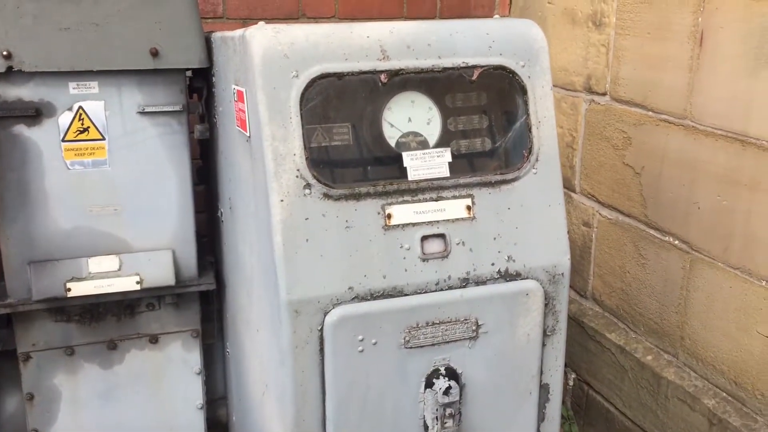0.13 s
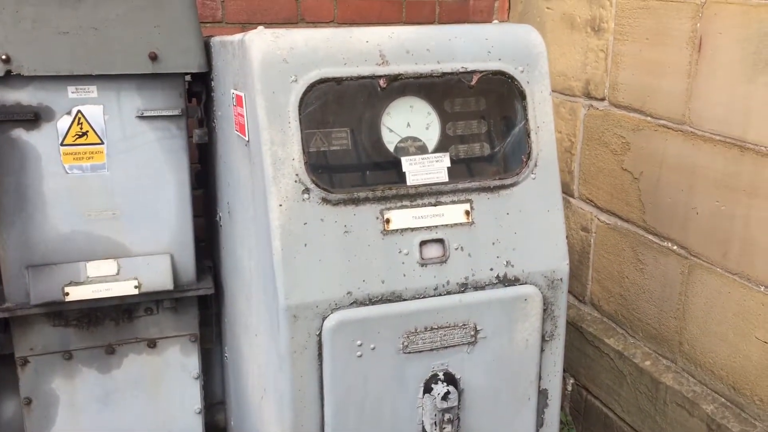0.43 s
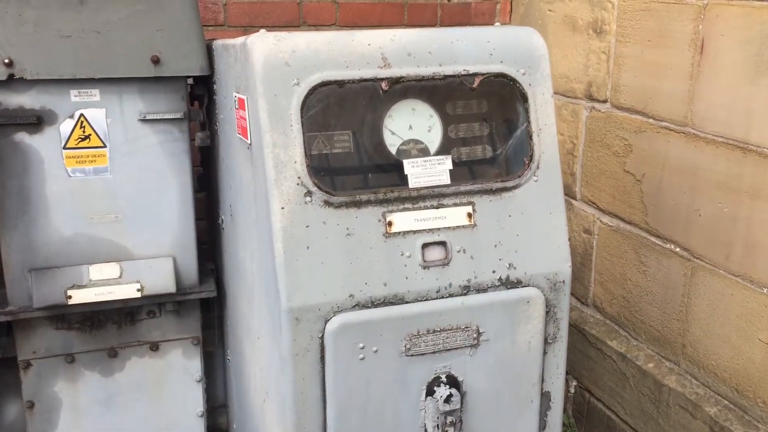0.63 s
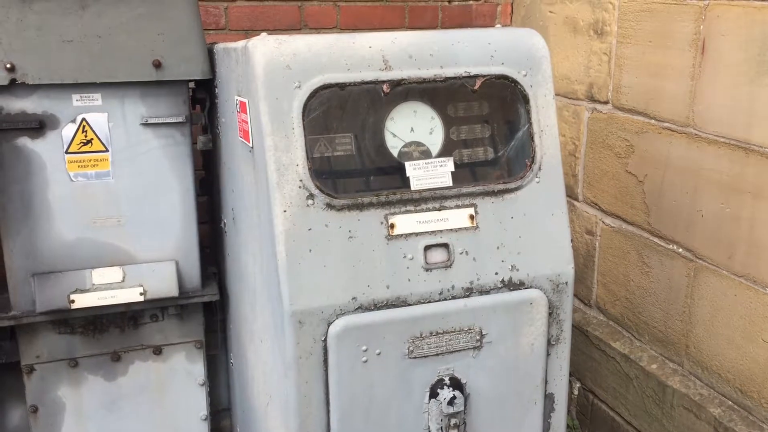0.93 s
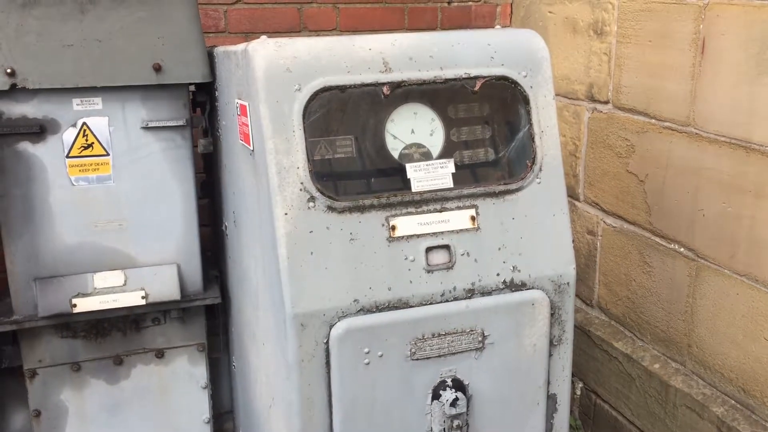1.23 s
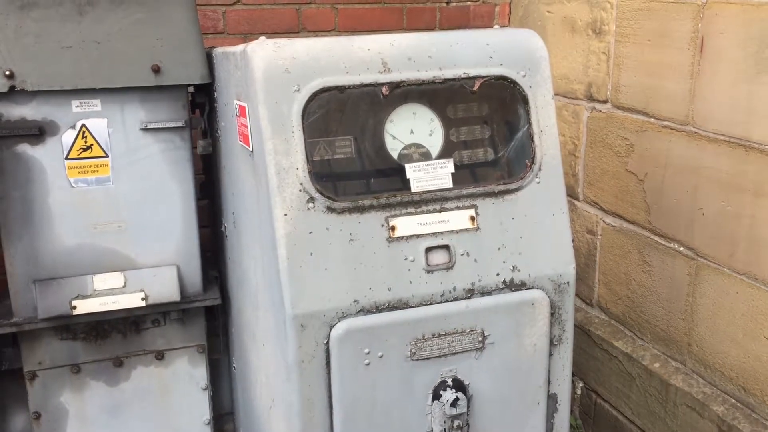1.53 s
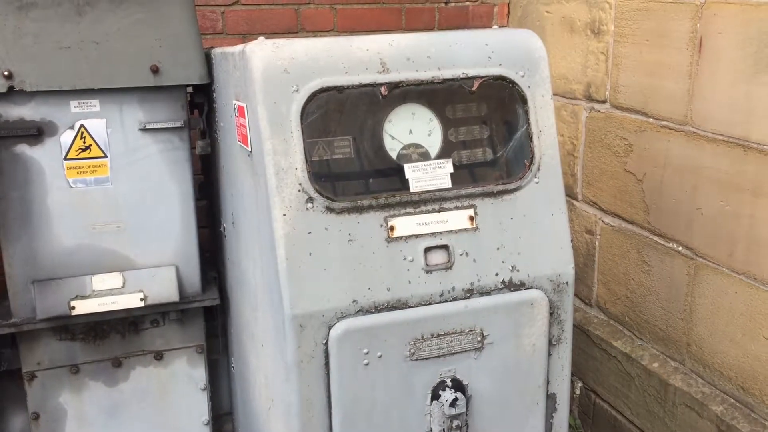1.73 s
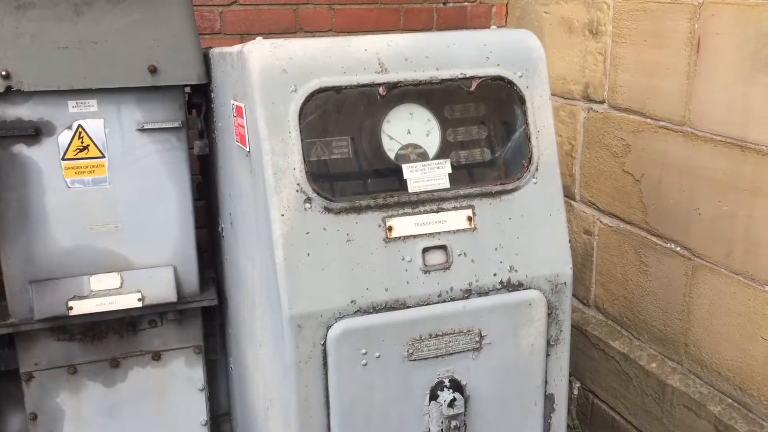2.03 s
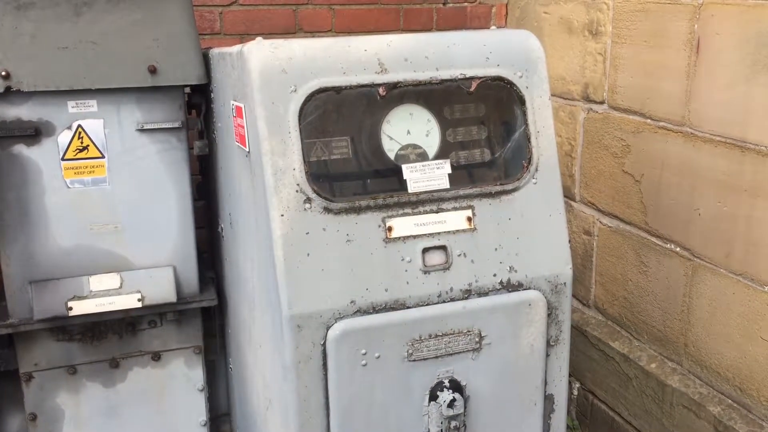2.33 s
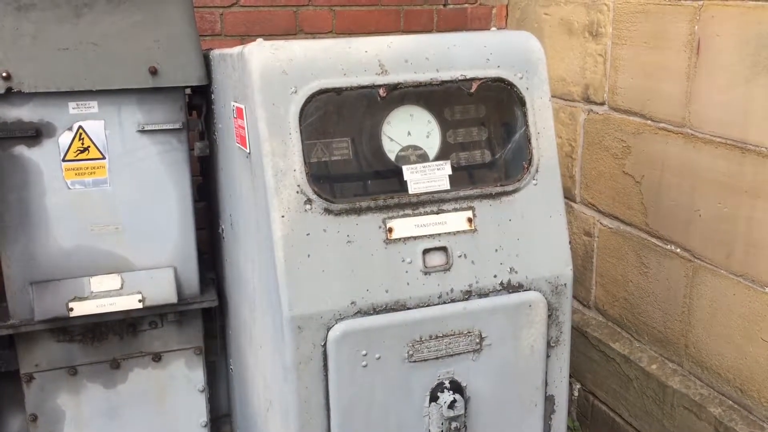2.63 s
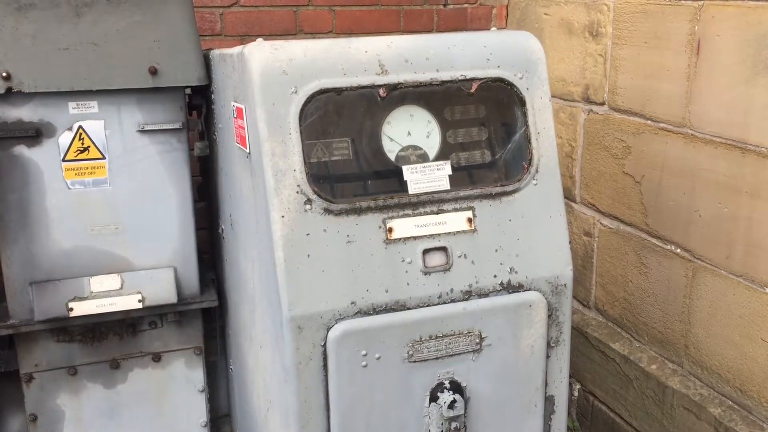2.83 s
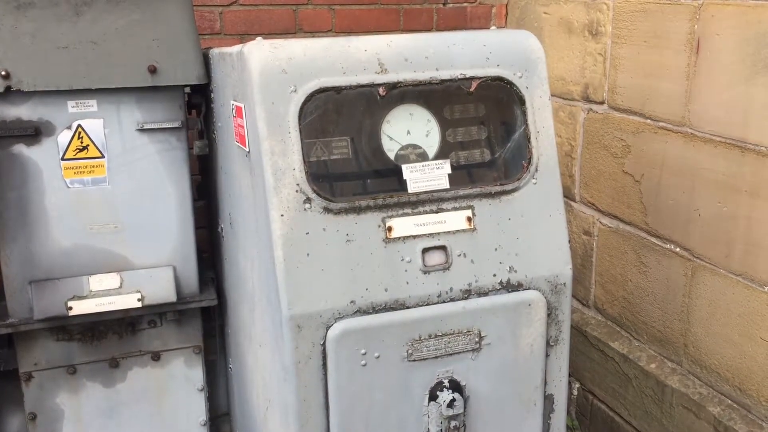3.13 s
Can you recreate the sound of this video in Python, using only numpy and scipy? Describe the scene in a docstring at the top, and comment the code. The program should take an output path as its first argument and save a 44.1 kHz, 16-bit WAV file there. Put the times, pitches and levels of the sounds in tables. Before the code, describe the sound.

Old electrical cabinets buzz steadily in a yard, with far traffic and light wind rumble.

```python
"""A steady buzz from old electrical cabinets in a walled yard, over the wash of distant traffic.
The iron core vibrates on multiples of twice the mains frequency. Light air rumbles on the
hand-held microphone and now and then buffets it; a tiny tick, a rustle and far chirps barely show."""
import sys
import numpy as np
from scipy import signal
from scipy.io import wavfile
from scipy.ndimage import uniform_filter1d

SR = 44100
rng = np.random.default_rng(int(sys.argv[2]) if len(sys.argv) > 2 else 0)


def to_wav(s):
    """Save 16-bit WAV."""
    ch = np.atleast_2d(s).T  # columns
    pcm = np.round(np.clip(ch, -1, 1) * 32767)  # PCM
    wavfile.write(sys.argv[1], SR, pcm.astype(np.int16))


N = 144648
T = np.arange(N) / SR


def amp(db):
    """Decibels to gain."""
    return 10 ** (np.asarray(db) / 20)


def unit(x):
    """Scales to rms 1."""
    return x / np.sqrt(np.mean(x ** 2) + 1e-20)


def curve(points):
    """Joins (time_s, value) points by straight lines."""
    return np.interp(T, *np.transpose(points))


def zero_phase(x, edges_hz, kind):
    """Butterworth filter run both ways, so the band stays in phase with its source."""
    return signal.sosfiltfilt(signal.butter(2, edges_hz, kind, fs=SR, output="sos"), x)


def wander(top_hz):
    """Slow random motion of rms 1, up to the given rate."""
    knots = np.linspace(0, T[-1], num=N // 256)
    rates = np.geomspace(top_hz / 10, top_hz, num=20)
    motion = sum(np.sin(2 * np.pi * (hz * knots + rng.random())) / np.sqrt(hz) for hz in rates)
    return unit(np.interp(T, knots, motion))


def flutter(top_hz):
    """Quick random change of strength and phase, as a complex gain of rms 1."""
    smooth = signal.butter(2, top_hz, fs=SR, output="sos")
    real, imag = unit(signal.sosfilt(smooth, rng.standard_normal((2, N))))
    return (real + 1j * imag) / np.sqrt(2)


def noise(spectrum, patchy_db):
    """Noise of rms 1 shaped by (freq_hz, density_db) points, mottled by drifting patches."""
    bin_hz, _, frames = signal.stft(rng.standard_normal(N), SR, nperseg=2048, noverlap=1536)
    freq_hz, density_db = np.transpose(spectrum)
    colour_db = np.interp(np.log(bin_hz + 1), np.log(freq_hz), density_db)
    patches = uniform_filter1d(rng.standard_normal(frames.shape), size=14, axis=0)
    patches = unit(uniform_filter1d(patches, size=10, axis=1))
    frames = frames * amp(colour_db[:, None] + patchy_db * patches)
    return unit(signal.istft(frames, SR, nperseg=2048, noverlap=1536)[1][:N])


def bump(centre_s, peak_db, half_width_s):
    """A bell-shaped envelope."""
    return amp(peak_db) * np.exp(-((T - centre_s) / half_width_s) ** 2)


def blip(centre_s, peak_db, pitch_hz, half_width_s):
    """A short tone that swells and dies away."""
    return bump(centre_s, peak_db, half_width_s) * np.sin(2 * np.pi * pitch_hz * (T - centre_s))


def cabinet_hum():
    """The core's mains-locked partials, each wavering as the microphone moves among the reflections."""
    # Partials of the iron core: multiple, level_db
    partials = [(1, -58), (2, -53.5), (3, -57.5), (5, -61.5), (7, -81), (8, -72), (9, -65.5), (11, -68),
                (19, -79), (21, -78.5), (23, -84.5), (26, -107.5), (27, -82), (29, -100), (37, -98),
                (40, -98), (42, -94)]
    # Swells of the second and third partials: time_s, gain_db
    second_swell = [(0, -7), (.33, -7), (.45, 4), (1.02, 3.5), (1.17, -7), (1.33, 4.5), (1.48, -4),
                    (1.8, 5.5), (1.89, -4), (2.25, -7), (2.5, -1), (2.62, -3), (2.77, 3), (2.88, -3),
                    (3.27, 0)]
    third_swell = [(0, -5), (.16, 2.5), (.48, 4), (.87, 1), (.97, 5), (1.17, -2), (1.26, 5.5), (1.42, -1),
                   (1.58, 4), (1.85, 3), (2.1, 2), (2.19, -4), (2.3, 1), (2.7, 3), (3.27, 2.5)]
    hum_hz, waver_hz, waver_db, drift_rad = 100.06, 8, 1.47, 0.17
    swell_db = {2: curve(second_swell), 3: curve(third_swell)}
    hum = np.zeros(N)
    for multiple, db in partials:
        level_db = db + waver_db * wander(waver_hz) + swell_db.get(multiple, 0)
        phase = 2 * np.pi * (multiple * hum_hz * T + rng.random())
        phase += drift_rad * np.sqrt(multiple) * wander(waver_hz)
        scattered = min(0.11 * multiple, 0.5) * flutter(top_hz=12)  # grows with pitch, up to a limit
        hum += np.sqrt(2) * amp(level_db) * ((1 + scattered) * np.exp(1j * phase)).imag
    return hum


def distant_traffic():
    """Tyre roar, dulled by distance and reflected by the walls; its middle and treble come and go."""
    # Colour of the roar in the yard: freq_hz, density_db
    spectrum = [(30, -18), (100, 9), (180, 6.5), (260, 5), (350, 0.5), (460, -2), (590, -3.5), (740, 0.5),
                (910, 1.7), (1020, 0.5), (1170, -1.5), (1400, -5.5), (1650, -7), (1850, -11.5),
                (2080, -16.5), (2400, -17), (2800, -21), (3050, -24), (4200, -31.5), (5000, -37.5),
                (16000, -73)]
    # Reflections off the yard walls: delay_s, gain_db
    walls = [(0.01, -17), (.023, -21)]
    # Slight swells of the whole roar, its treble and its middle: time_s, gain_db
    swell = [(0, .5), (.7, 0.65), (1.4, -1.1), (2.1, 0), (2.6, -0.5), (3.27, -1)]
    treble_swell = [(0, -1), (.65, -0.6), (1.2, 0), (2.1, -0.8), (2.4, -2), (2.6, -0.5), (3.27, 0.3)]
    mid_swell = [(0, -1), (.7, -0.5), (1.4, -0.2), (2.1, -0.5), (2.5, 1), (2.8, 0), (3.27, -1)]
    level_db = -47.5
    direct = noise(spectrum, patchy_db=1.4)
    reflected = sum(amp(db) * np.roll(direct, round(delay_s * SR)) for delay_s, db in walls)
    roar = unit(direct + reflected)
    treble_change = (amp(curve(treble_swell)) - 1) * zero_phase(roar, 1360, "highpass")
    mid_change = (amp(curve(mid_swell)) - 1) * zero_phase(roar, (900, 1115), "bandpass")
    return amp(level_db + curve(swell)) * (roar + treble_change + mid_change)


def air_rumble():
    """Light air moving past the microphone makes a low, lumpy rumble."""
    # Colour of the rumble: freq_hz, density_db
    spectrum = [(10, -41), (22, -28), (35, -16.5), (52, 11), (80, 1), (112, -13), (140, -2.5), (200, -21),
                (400, -38.5), (1500, -93)]
    # Rise and fall of the rumble, ahead of the low cut: time_s, level_db
    levels = [(0, -47), (.2, -52), (.3, -46.5), (.45, -48.5), (.7, -48), (.88, -46), (1.1, -47.5),
              (1.3, -54), (1.6, -51), (2.0, -50), (2.2, -46.5), (2.6, -50.5), (2.86, -46), (3.0, -52),
              (3.27, -50)]
    lumps_db, low_cut_hz = 0.44, 32
    envelope = amp(curve(levels) + lumps_db * wander(top_hz=3.9))
    return zero_phase(envelope * noise(spectrum, patchy_db=-0.5), low_cut_hz, "highpass")


def air_buffets():
    """Air bumps the microphone, each time a soft push with a puff of turbulence."""
    # Pushes on the microphone: centre_s, peak_db, pitch_hz, half_width_s
    buffets = [(0.025, -27, 80, 0.011), (.071, -29.5, 107, .007), (0.108, -31.5, 57.3, .019),
               (1.022, -33, 81, 0.0078), (1.078, -38, 80, 0.0075), (2.305, -37, 260, .004),
               (2.317, -30.5, 92, 0.012), (2.3382, -21.8, 94, 0.0063)]
    # Colour of the turbulence: freq_hz, density_db
    spectrum = [(40, -14), (150, 0), (220, -1), (330, -20), (900, -62), (3000, -120)]
    puff_db = -15  # against each push's peak
    envelope = sum(bump(centre_s, db, half_width_s) for centre_s, db, _, half_width_s in buffets)
    puffs = amp(puff_db) * envelope * noise(spectrum, patchy_db=1.5)
    return puffs + sum(blip(*row) for row in buffets)


def tick(start_s, level_db):
    """A small hard contact that rings very briefly."""
    # Ringing modes: freq_hz, gain_db, t60_s
    modes = [(3580, 2, 0.021), (4200, -6, .006), (4930, -5, 0.005), (5600, -3, 0.007), (6540, -7, 0.02)]
    age_s = np.maximum(T - start_s, 0)
    return sum(amp(level_db + db - 60 * age_s / t60_s) * np.sin(2 * np.pi * hz * age_s)
               for hz, db, t60_s in modes)


def rustle(centre_s, level_db):
    """A soft, short brush of high noise."""
    # Colour of the rustle: freq_hz, density_db
    spectrum = [(1000, -25), (2800, 0), (3600, -6), (5000, -9), (12000, -25)]
    return bump(centre_s, level_db, half_width_s=0.025) * noise(spectrum, patchy_db=4.0)


def far_chirps():
    """Three faint pips from far off, each on one pitch."""
    # Chirps: centre_s, peak_db, pitch_hz, half_width_s
    chirps = [(.045, -67.5, 2770, .02), (.082, -67.5, 2830, .016), (1.248, -57, 2110, .014)]
    return sum(blip(*row) for row in chirps)


def microphone_hiss(level_db):
    """The microphone's own faint, steady noise."""
    # Colour of the hiss: freq_hz, density_db
    spectrum = [(1000, -0.5), (4400, 3.5), (4950, -2), (5400, 3), (6600, 1), (7600, -2), (8300, -1),
                (9600, -2), (10400, -7), (11200, -3.5), (13000, -4.5), (15700, -7)]
    return amp(level_db) * noise(spectrum, patchy_db=1.0)


def scene():
    """Everything that reaches the one hand-held microphone in the yard."""
    yard = cabinet_hum() + distant_traffic() + air_rumble() + air_buffets()
    details = tick(start_s=1.053, level_db=-57) + rustle(centre_s=2.555, level_db=-72) + far_chirps()
    return (yard + details)[None]


def record(dry):
    """Adds the microphone's hiss, then cuts the highest treble."""
    edge_hz = 15720
    lowpass = signal.firwin(801, edge_hz, window=("kaiser", 9), fs=SR)
    return signal.oaconvolve(dry + microphone_hiss(level_db=-74), lowpass[None], "same")


dry = scene()
out = record(dry)
to_wav(out)
```